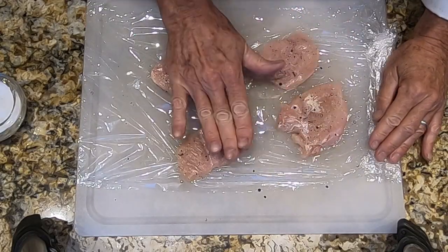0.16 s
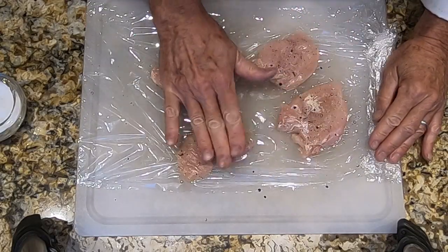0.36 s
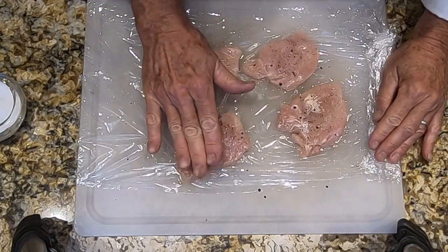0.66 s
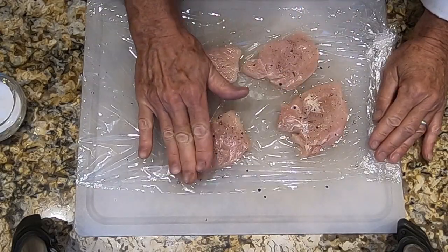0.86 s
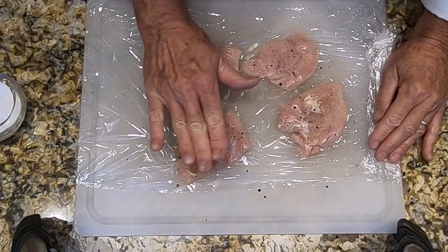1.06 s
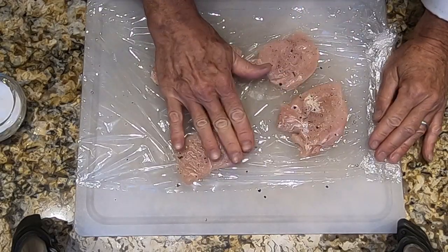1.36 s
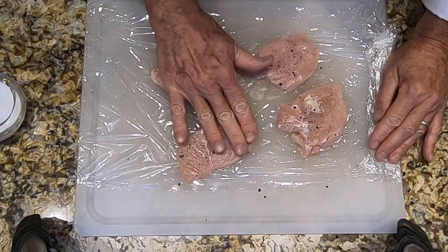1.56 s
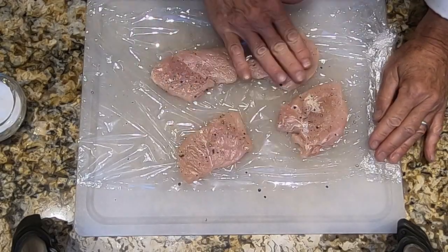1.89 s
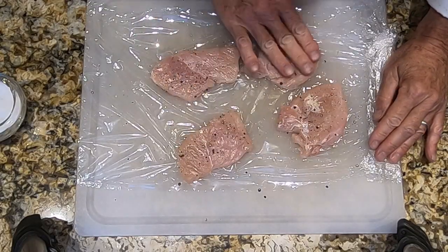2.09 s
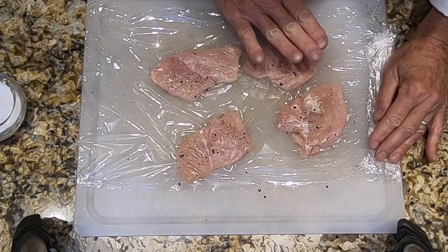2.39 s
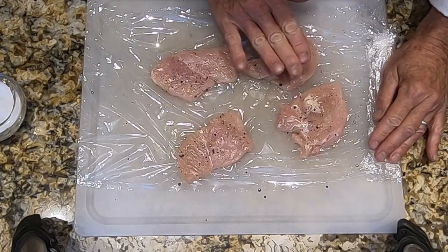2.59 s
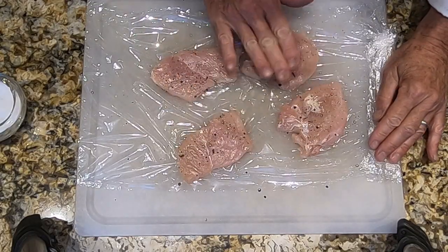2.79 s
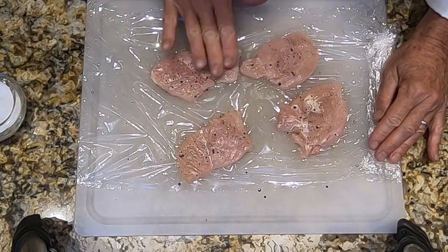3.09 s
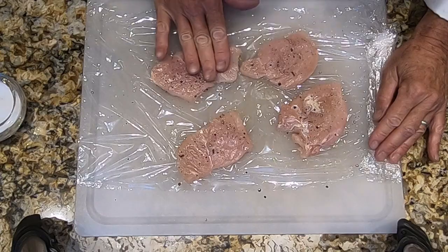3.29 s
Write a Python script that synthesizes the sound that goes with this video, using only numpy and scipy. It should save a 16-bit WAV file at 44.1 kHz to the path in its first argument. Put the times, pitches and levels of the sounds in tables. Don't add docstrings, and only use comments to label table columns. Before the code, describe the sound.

About five pats a second on film-covered raw meat: small wet smack, heavy low boom with rattling loose parts, mostly right, then crackling film and snaps as fingers lift. Close microphone, faint room and fan hum.

```python
import sys
import numpy as np
from scipy import signal
from scipy.fft import rfft, irfft
from scipy.io import wavfile
from scipy.ndimage import uniform_filter1d, minimum_filter1d

SR = 44100
rng = np.random.default_rng(int(sys.argv[2]) if len(sys.argv) > 2 else 0)


def level_to_linear(level):
    exponent = np.asarray(level, float) / 20
    return 10 ** exponent


def output_pcm(signal):
    pcm = np.clip(np.atleast_2d(signal).T, -1, 1) * 32767
    wavfile.write(sys.argv[1], SR, np.round(pcm).astype(np.int16))


N = 152145

# (time [s], force [dB], contact [ms])
PUSHES = [(-0.0725, -4, 1.9), (0.1832, 1.7, 1.63), (0.3903, -3.8, 2.69), (0.5752, 1.7, 2.01),
          (0.7526, 0.6, 1.79), (0.9168, 2.4, 2.08), (1.0923, 2.1, 1.89), (1.3279, 2.2, 2.12),
          (1.5385, 0.6, 1.76), (1.7105, 0.4, 1.81), (2.0786, 1.2, 1.75), (2.2793, 1.1, 2.1),
          (2.458, 2.4, 1.78), (2.6539, 2.1, 1.96), (2.8319, 1.3, 1.45), (3.0116, 1.8, 1.69),
          (3.2926, 2.1, 2.3)]
# (time [s], film [dB], flesh [dB], left over right [dB], counter shelf [dB])
SLAPS = [(0.176, -51, -51.5, 0.5, -22.5), (0.3843, -56, -80, -1.5, -36), (0.5705, -49.5, -58.5, -2.5, -30),
         (0.7457, -53.5, -64, -2, -34.5), (0.9102, -51, -65, -1.5, -32), (1.0846, -48, -64, -1, -28),
         (1.3188, -46, -57.5, 0.5, -26.5), (1.5309, -50, -54, -3, -29), (1.705, -53.5, -64.5, -1.5, -33),
         (2.0695, -49, -52.5, -1.5, -22), (2.2705, -52.5, -56, -5.5, -27.5),
         (2.4502, -49.5, -53.5, -2, -24), (2.644, -48.5, -52, -2, -25.5), (2.8245, -53.5, -52.5, -5, -22.5),
         (3.0027, -53.5, -52.5, -3, -24.5), (3.2838, -55, -53.5, -5, -25.5)]
# (frequency [Hz], level [dB])
PEEL_COLOUR = [(1200, -4.5), (2300, -7.5), (3200, -4.5), (4300, -4.5), (6000, 1), (7600, -6.5), (8300, -14),
               (15500, -39.5)]


def evened(x):
    return x / np.sqrt(np.mean(x ** 2, axis=-1, keepdims=True) + 1e-20)


def read(points, hz):
    f, value = np.transpose(points)
    return np.interp(np.log(hz + 1), np.log(f + 1), value, left=value[0], right=value[-1])


def colour(x, points):
    hz = np.fft.rfftfreq(x.shape[-1], 1 / SR)
    gain = level_to_linear(read(points, hz)) * np.minimum(hz / points[0][0], 1) ** 2
    return irfft(rfft(x) * gain, x.shape[-1])


def pair(x, same):
    same = np.clip(same, 0, 1)
    return np.sqrt(same) * x[0] + np.sqrt(1 - same) * x[1:]


def resonate(x, hz, width_hz):
    r = np.exp(-np.pi * width_hz / SR)
    return 2 * signal.lfilter([1 - r], [1, -r * np.exp(2j * np.pi * hz / SR)], x).real


def resonate_twice(x, hz, width_hz, second_width_hz):
    return resonate(resonate(x, hz, width_hz), hz, second_width_hz)


def burst(s, rise_s, t60):
    u = np.maximum(np.arange(N) / SR - s, 0)
    return (1 - np.exp(-u / rise_s)) * level_to_linear(-60 * u / t60)


def panned(db):
    return level_to_linear(np.array([[db / 2], [-db / 2]]))


def settle(u):
    return level_to_linear(-243 * np.maximum(u - 0.2, 0))


def snaps(per_s, spread_db):
    size = level_to_linear(spread_db * np.minimum(rng.exponential(1, (3, N)), 4)) * rng.standard_normal((3, N))
    return size * (rng.random((3, N)) < per_s / SR)


def patchy(x, depth_db):
    z = signal.stft(x, nperseg=256)[2]
    field = uniform_filter1d(rng.standard_normal(z.shape[1:]), size=9, axis=0)
    field = uniform_filter1d(field, size=3, axis=1)
    return signal.istft(z * level_to_linear(depth_db * field / field.std()), nperseg=256)[1][:, :N]


def slaps():
    # (frequency [Hz], level [dB])
    film_colour = [(1500, -20), (2000, -8.5), (3600, -6), (4300, -7.5), (6000, 0.5), (7600, -9),
                   (8300, -18), (15500, -38.5)]
    # (frequency [Hz], width [Hz], level [dB])
    flesh_modes = [(685, 370, 1), (1223, 120, -7.5), (442, 57, -0.5)]
    film = evened(colour(pair(snaps(11000, 0.75), 0.47), film_colour))
    noise = pair(rng.standard_normal((3, N)), 0.073)
    flesh = evened(sum(level_to_linear(db) * resonate_twice(noise, hz, w, 2 * w) for hz, w, db in flesh_modes))
    out = np.zeros((2, N))
    for s, film_db, flesh_db, pan_db, _ in SLAPS:
        crack = burst(s - .0004, rise_s=0.00072, t60=0.03)
        spread = level_to_linear(-12) * burst(s, rise_s=0.0075, t60=0.35)
        wet = level_to_linear(film_db - 5.5) * (crack + spread) * film
        dull = level_to_linear(flesh_db + 2.0) * burst(s - .001, rise_s=0.0058, t60=0.11) * flesh
        out += panned(pan_db) * (wet + dull)
    return out


def stand():
    # (frequency [Hz], t60 [s], signed motion at left port, at right port)
    modes = [(28.5, 1.17, -.002, -.022), (33.1, .74, .0015, .02), (46.4, 1.16, .0053, .053),
             (51.7, .67, .005, .01), (58.5, .53, .0118, .26), (64.7, .84, -.0021, .073),
             (69.8, .97, .0021, .027), (77.8, .3, -.0062, -.315), (92.5, .85, -.0007, -.015),
             (95.7, .44, .0062, -.037), (119.4, .14, -.0015, -.088)]
    lead = 8820
    t = (np.arange(N + lead) - lead) / SR
    force = sum(level_to_linear(db) * np.exp(-.5 * ((t - s) * 1000 / ms) ** 2) / ms for s, db, ms in PUSHES)
    force = force * 1000 / SR / np.sqrt(2 * np.pi)
    u = np.arange(SR) / SR
    ring = np.zeros((2, SR))
    for hz, t60, left, right in modes:
        ring += np.outer([left, right], level_to_linear(-60 * u / t60) * np.sin(2 * np.pi * hz * u))
    motion = signal.fftconvolve(force[None], ring * settle(u), axes=1)[:, lead:lead + N]
    return motion * level_to_linear(np.array([[.5], [.6]]))


def shake():
    # (frequency [Hz], level [dB])
    rumble = [(20, 8.5), (50, -1.5), (80, 8.5), (130, -7), (165, -4), (240, -29), (400, -35.5),
              (3000, -110)]
    port_db = [
        [-45.5],
        [-34],
    ]
    t = np.arange(N) / SR
    swell = sum(level_to_linear(db) * burst(s - .004, rise_s=.007, t60=0.74) * settle(t - s) for s, db, _ in PUSHES)
    return level_to_linear(np.array(port_db)) * swell * evened(colour(rng.standard_normal((2, N)), rumble))


def rattle(motion):
    # (frequency [Hz], level [dB])
    buzz_colour = [(150, 0.5), (300, 0), (500, -15), (1000, -23.5), (2500, -30), (5000, -40.5),
                   (9000, -55.5), (15500, -67.5)]
    port_db = [
        [-86.5],
        [-48],
    ]
    swing = uniform_filter1d(abs(motion[1]), size=120) / 0.23
    loose = sum(burst(s - .003, rise_s=0.0048, t60=0.17) for s, _, _ in PUSHES)
    buzz = evened(colour(snaps(per_s=7000, spread_db=2.5)[:2], buzz_colour))
    return level_to_linear(np.array(port_db)) * loose * (0.31 + swing ** 2.3) * buzz


def jolts():
    port_db = [
        [-64],
        [-42],
    ]
    delay_s, thud_hz, width_ms = 0.00822, 301, 1.4
    t = np.arange(N) / SR
    thud = np.zeros(N)
    for s, db, _ in PUSHES:
        u = t - s - delay_s
        thud += level_to_linear(0.98 * db) * np.exp(-.5 * (u * 1000 / width_ms) ** 2) * np.cos(2 * np.pi * thud_hz * u)
    return level_to_linear(np.array(port_db)) * thud


def knocks(modes, times, rise_s, levels_db, turns, hold_s=1.):
    out, u = np.zeros((2, N + SR)), np.arange(SR // 2) / SR
    damping_db = np.minimum(299.5 * np.maximum(u - hold_s, 0), 9)
    fade = (1 - np.exp(-u / rise_s)) * settle(u) * level_to_linear(-damping_db)
    for s, level_db, turn in zip(times, levels_db, turns):
        for (hz, t60, left_db, right_db), start in zip(modes, turn):
            ring = fade * level_to_linear(level_db - 60 * u / t60) * np.sin(2 * np.pi * (hz * u + start))
            out[:, round(s * SR):][:, :len(u)] += np.outer([-level_to_linear(left_db), level_to_linear(right_db)], ring)
    return out[:, :N]


def board():
    # (frequency [Hz], t60 [s], left [dB], right [dB])
    board_modes = [(214.5, 0.11, -70, -44), (305, 0.035, -69, -45.5), (457, 0.014, -68.5, -52),
                   (836, .07, -66.5, -59.5), (1350, 0.036, -61.5, -66.5)]
    # (frequency [Hz], t60 [s], left [dB], right [dB])
    shelf_modes = [(157, 0.11, -25, 1.5), (160.68, 0.64, -17.5, -0.5)]
    # (frequency [Hz], t60 [s], left [dB], right [dB])
    rebound_modes = [(243.2, 0.18, -27, -16.5), (272, 0.21, -40, -24), (318, .1, -36.5, -26)]
    landing_s, flesh_db, shelf_db = np.transpose(SLAPS)[[0, 2, 4]]
    push_s = np.transpose(PUSHES[1:])[0]
    count = len(SLAPS)
    turns = rng.random((count, len(board_modes)))
    knock = knocks(board_modes, landing_s, 0.01, flesh_db + 62.5, turns)
    still = np.zeros((count, len(shelf_modes)))
    shelf = knocks(shelf_modes, push_s - .006, 0.022, shelf_db, still, hold_s=0.072)
    still = np.zeros((count, len(rebound_modes)))
    rebound = knocks(rebound_modes, push_s + .031, 0.0049, shelf_db, still)
    return knock + shelf + rebound


def peels():
    # (start [s], length [s], crackle [dB], pocket [Hz], pocket [dB])
    lifts = [(0.224, 0.1, -69, 2400, -73), (0.297, 0.032, -69.5, 2600, -96), (0.447, 0.11, -66, 2200, -73),
             (0.624, 0.088, -68.5, 2470, -77), (0.785, 0.096, -74, 2200, -76.5),
             (0.96, 0.11, -74, 2290, -71.5), (1.143, 0.047, -66, 2500, -61.5),
             (1.193, 0.061, -72, 3280, -67.5), (1.367, 0.074, -68, 2500, -69.5),
             (1.58, 0.11, -67, 2420, -67.5), (1.761, 0.05, -63.5, 2440, -64.5),
             (1.817, 0.072, -70.5, 2970, -89), (2.078, 0.098, -68, 2600, -83),
             (2.289, 0.11, -78, 2414, -106), (2.498, 0.11, -68, 2800, -77.5),
             (2.696, 0.051, -71, 2500, -85.5), (2.86, .1, -68, 2310, -80.5), (3.045, 0.092, -71, 2370, -79),
             (3.338, 0.058, -65, 2250, -68.5), (3.39, 0.051, -70.5, 2660, -72)]
    rise_s, fade_db, pocket_width_hz = 0.013, -8, 760
    sticky = patchy(pair(snaps(per_s=6000, spread_db=3.5), 0.51), depth_db=3.5)
    crackle, sticky = evened(colour(sticky, PEEL_COLOUR)), evened(sticky)
    out = np.zeros((2, N + SR))
    for s, length, db, pocket_hz, pocket_db in lifts:
        at = round(s * SR)
        u = np.arange(min(round(2.2 * length * SR), N - at)) / SR
        part = slice(at, at + len(u))
        shape = np.minimum(u / rise_s, 1) * level_to_linear(fade_db * (u / length) ** 3)
        pocket = evened(resonate_twice(sticky[:, part], pocket_hz, pocket_width_hz, 2 * pocket_width_hz))
        pocket = level_to_linear(pocket_db) * pocket * level_to_linear(-6.5 * u / length)
        out[:, part] += shape * (level_to_linear(db) * crackle[:, part] + pocket)
    return panned(-.8) * out[:, :N]


def ticks():
    # (time [s], level [dB], centre [Hz])
    low_ticks = [(0.2563, -58.5, 2400), (0.2833, -50, 2410), (0.4683, -57, 2620), (0.6374, -64, 2620),
                 (0.8056, -66, 2200), (0.9797, -57.5, 2270), (1.1593, -52.5, 2450), (1.2161, -53, 3570),
                 (1.3834, -55, 2310), (1.6005, -59.5, 2330), (1.7724, -54, 2620), (3.356, -44, 2590),
                 (3.4042, -62, 3130)]
    # (time [s], level [dB], centre [Hz])
    bright_ticks = [(0.176, -55, 5190), (0.31, -57, 6120), (0.462, -53.5, 5730), (0.5023, -65.5, 6050),
                    (0.5172, -44.5, 5570), (0.5324, -57.5, 5090), (0.5706, -56, 5740), (1.045, -56, 6100),
                    (1.2004, -66.5, 4650), (1.3093, -57.5, 6170), (1.7624, -51.5, 6200),
                    (1.8563, -50.5, 5960), (2.057, -67, 5590), (2.0696, -46, 5760), (2.1122, -56.5, 5900),
                    (2.2555, -60, 4640), (2.2732, -40.5, 5720), (2.374, -62, 5300), (2.5037, -58, 5020),
                    (2.5343, -39, 5770), (2.6447, -35, 5630), (2.7048, -59, 5540), (2.8734, -53.5, 5320),
                    (3.0555, -66.5, 4570), (3.2844, -52, 5680), (3.34, -57, 6160), (3.3591, -37, 5510)]
    width_hz, rise_s, t60_s = 900, .0004, .008
    all_ticks = low_ticks + bright_ticks
    out, u = np.zeros((2, N)), np.arange(1024) / SR
    draws = rng.standard_normal((len(all_ticks), 3, 1024))
    for (s, db, hz), draw in zip(all_ticks, draws):
        noise = pair(draw, 0.63)
        tone = evened(resonate_twice(noise, hz, width_hz, width_hz))
        tone = tone + level_to_linear(-1) * evened(colour(noise, PEEL_COLOUR))
        shape = np.minimum(u / rise_s, 1) * level_to_linear(db - 11 - 60 * u / t60_s)
        out[:, round(s * SR):][:, :1024] += shape * tone
    return out


def kitchen():
    # (frequency [Hz], level [dB])
    hum_colour = [(100, -0.5), (430, -29), (800, -23.5), (2200, -38), (4000, -46), (6000, -42),
                  (10000, -50), (15500, -56)]
    # (frequency [Hz], correlation)
    likeness = [(60, 0.86), (400, -0.65), (1000, -0.8), (2800, -0.25), (6000, 0.46), (9000, 0.021)]
    hz = np.fft.rfftfreq(N, 1 / SR)
    left, other = rfft(rng.standard_normal((2, N)))
    same = np.clip(read(likeness, hz), -1, 1)
    noise = irfft(np.array([left, same * left + np.sqrt(1 - same ** 2) * other]), N)
    fan = evened(resonate_twice(noise, 746, 610, 610))
    return panned(-1) * (level_to_linear(-61) * evened(colour(noise, hum_colour)) + level_to_linear(-80.5) * fan)


def scene():
    motion = stand()
    hands = slaps() + peels() + ticks()
    counter = motion + shake() + rattle(motion) + jolts() + board()
    return hands + counter + kitchen()


def low_pass(x):
    return signal.sosfilt(signal.butter(12, 15700, fs=SR, output="sos"), x)


def record(dry):
    limit_db, step_samples = -10, 128
    peak = -minimum_filter1d(-abs(dry), size=900, axis=1)
    level_db = 20 * np.log10(peak + 1e-9)
    over_db = uniform_filter1d(np.maximum(level_db - limit_db, 0), size=900, axis=1)
    held = dry * level_to_linear(-0.25 * uniform_filter1d(over_db, size=300, axis=1))
    on_step = np.arange(N) % step_samples == 0
    clicks = dry * np.minimum(over_db / 1.5, 1) ** 2 * on_step
    held = held + level_to_linear(-46) * np.diff(clicks, prepend=0, axis=1)
    return low_pass(held + 0.0001)


dry = scene()
out = record(dry)
output_pcm(out)
```